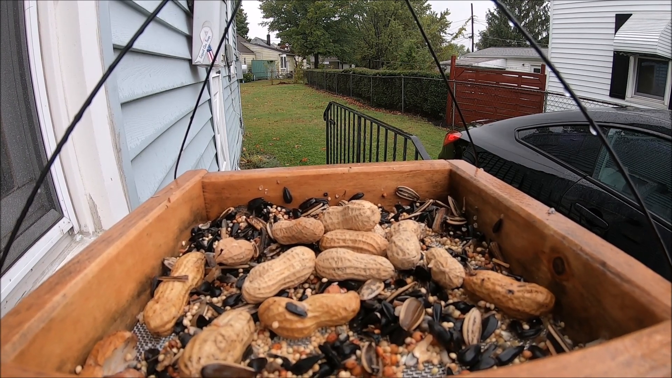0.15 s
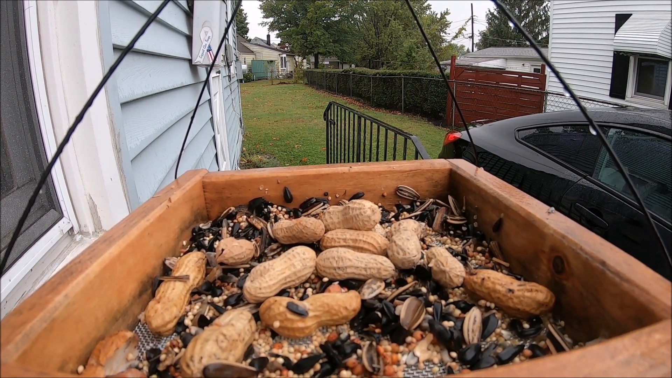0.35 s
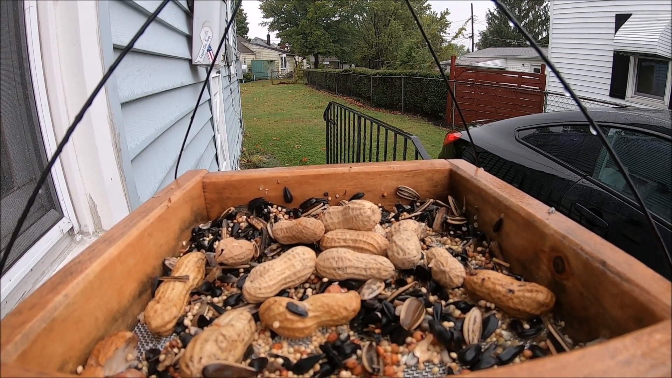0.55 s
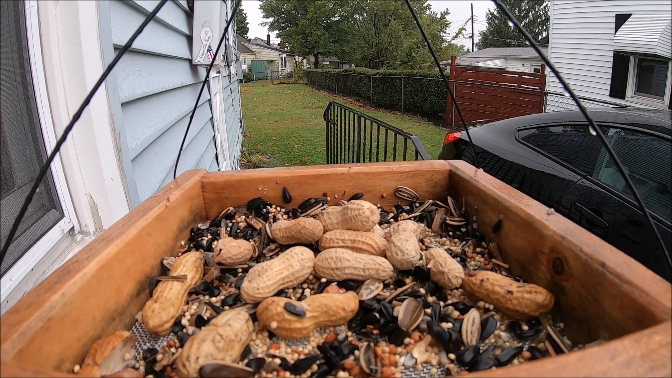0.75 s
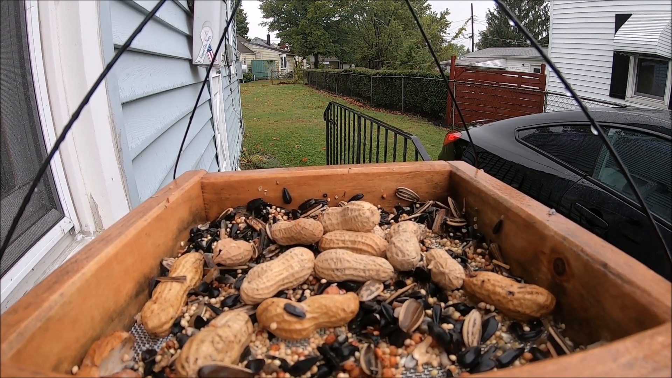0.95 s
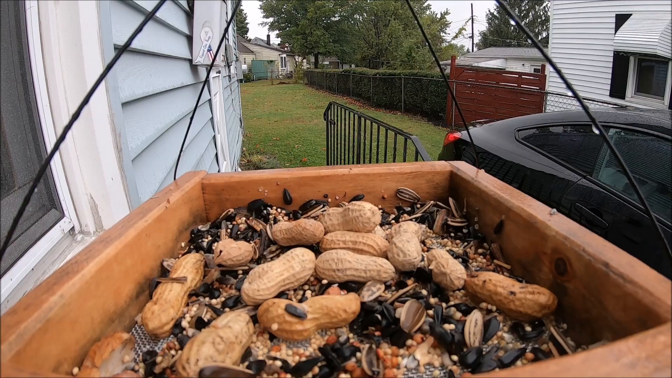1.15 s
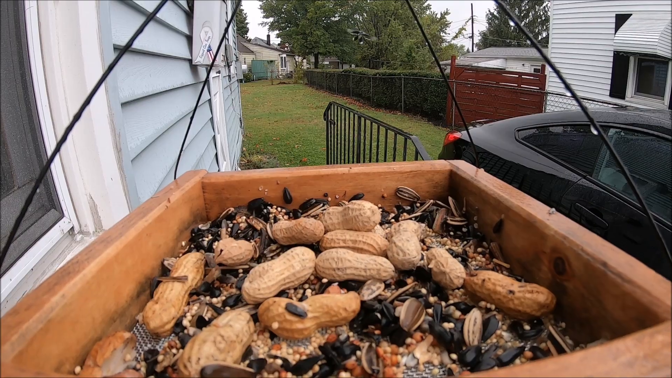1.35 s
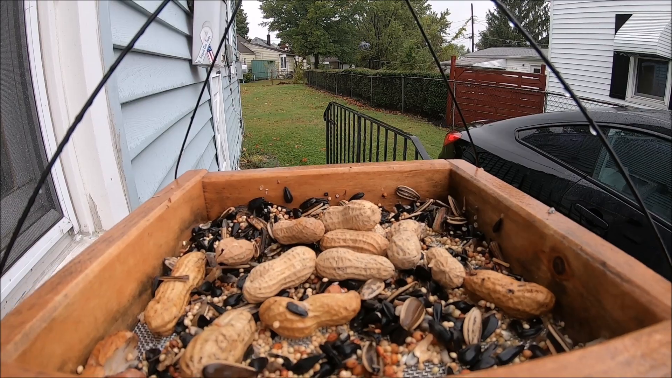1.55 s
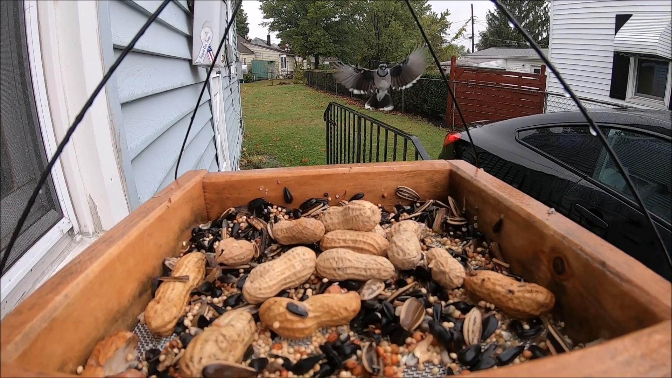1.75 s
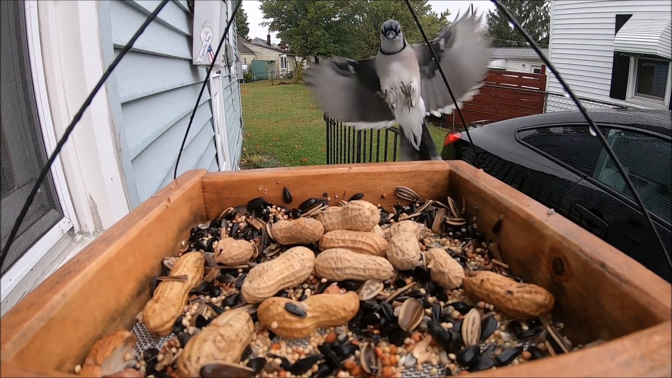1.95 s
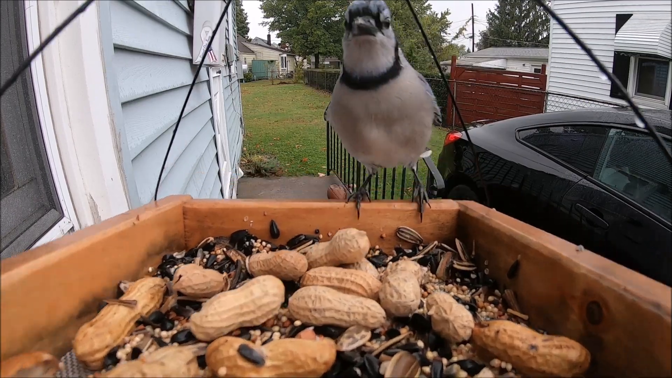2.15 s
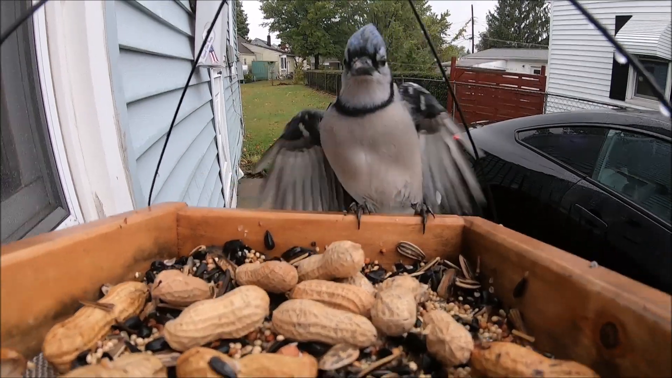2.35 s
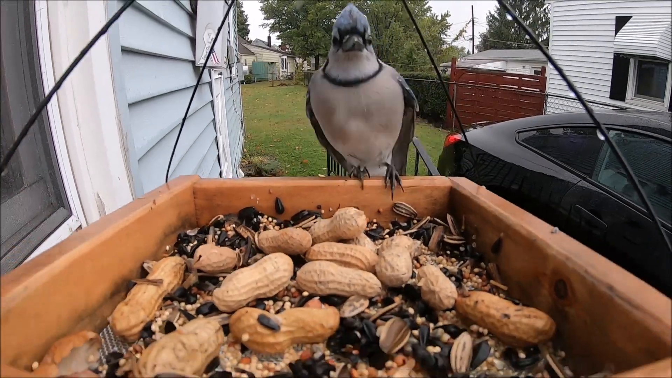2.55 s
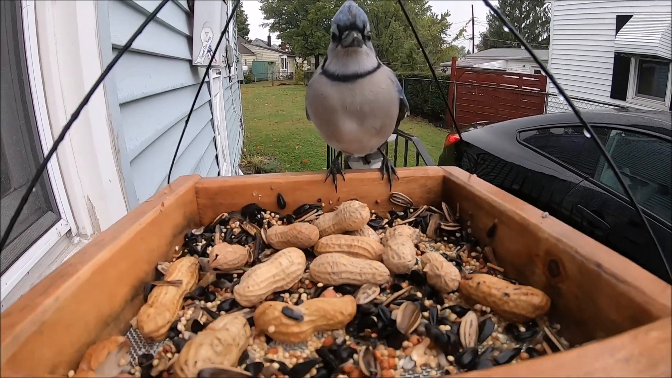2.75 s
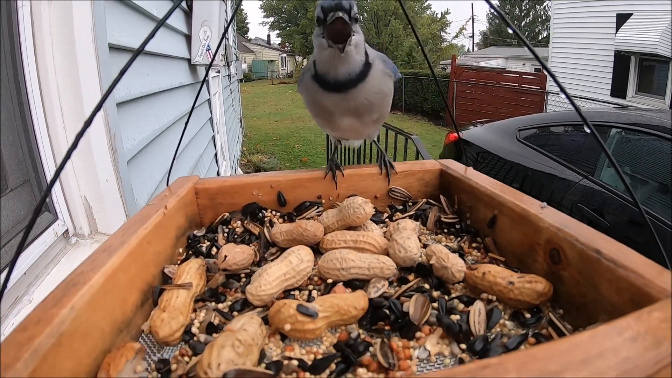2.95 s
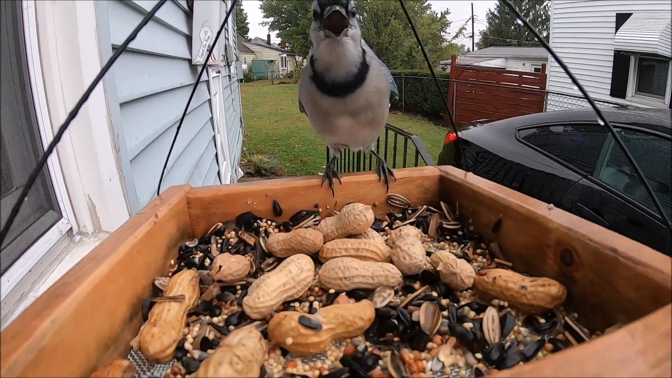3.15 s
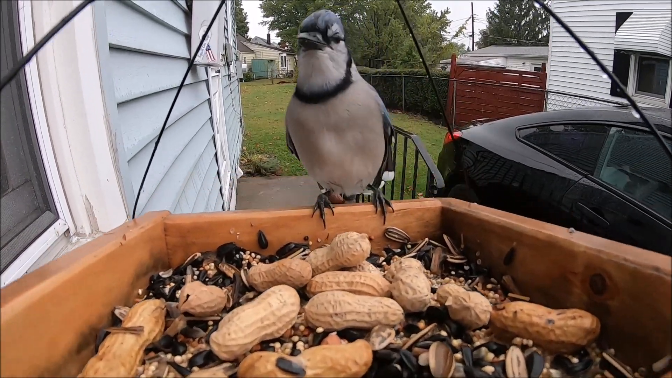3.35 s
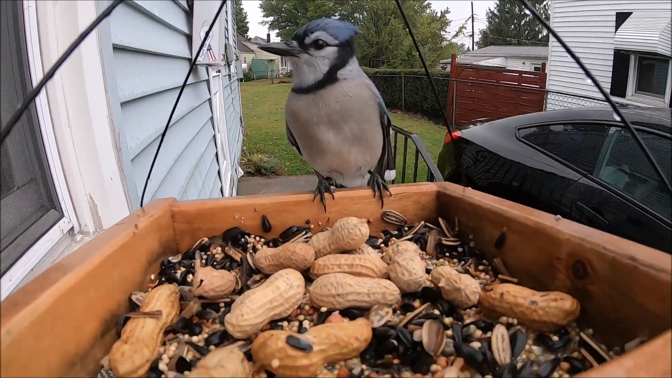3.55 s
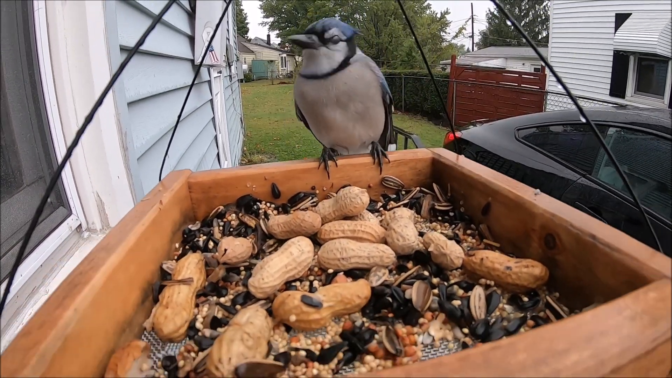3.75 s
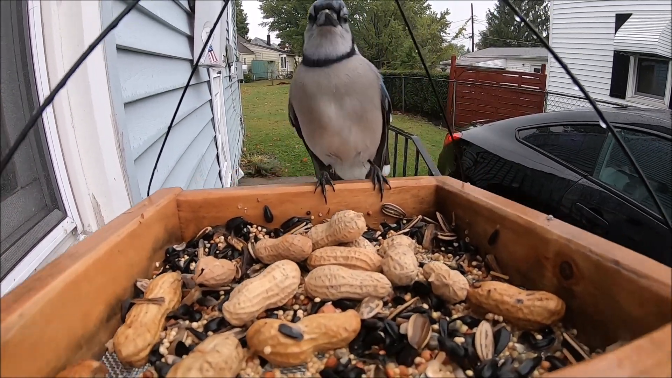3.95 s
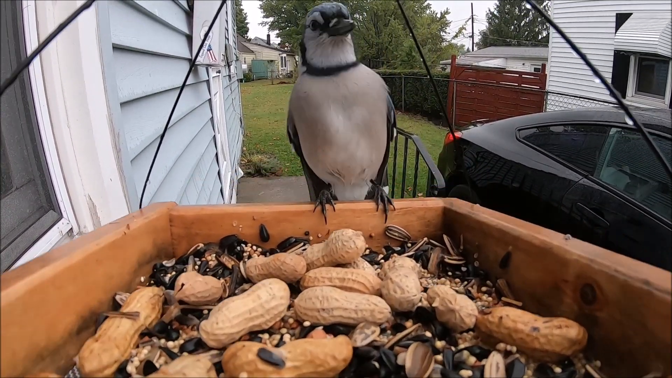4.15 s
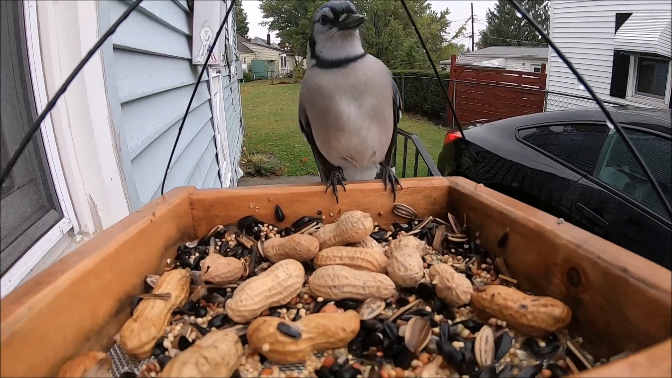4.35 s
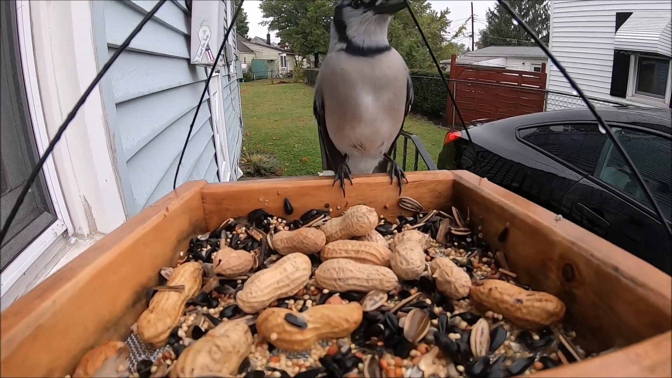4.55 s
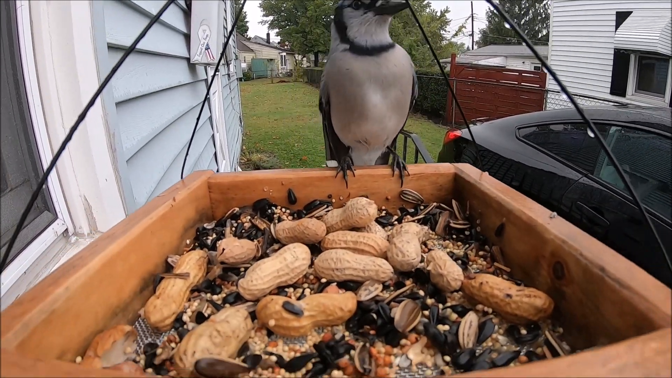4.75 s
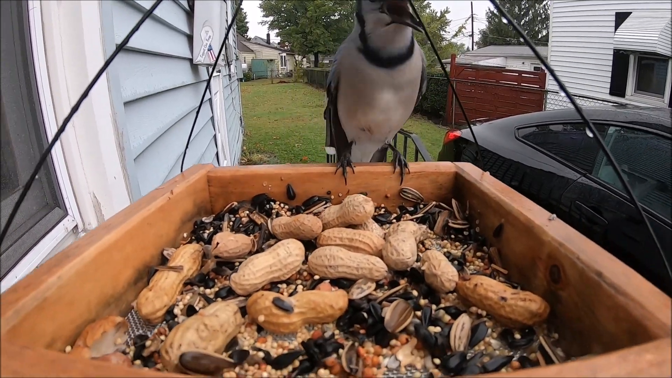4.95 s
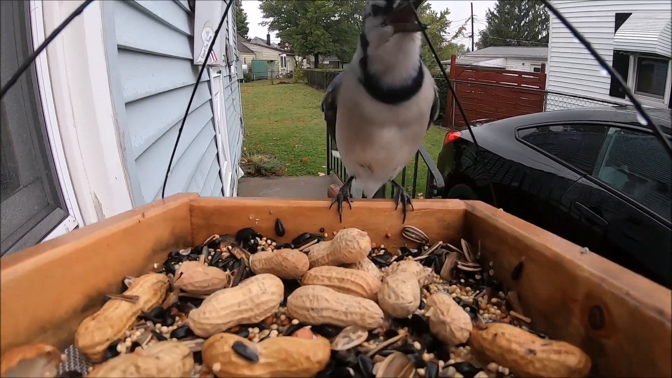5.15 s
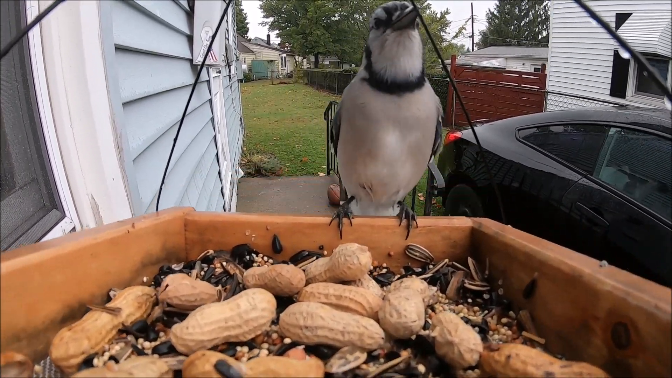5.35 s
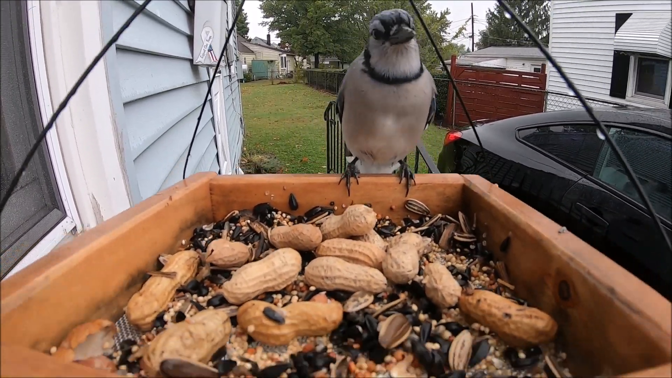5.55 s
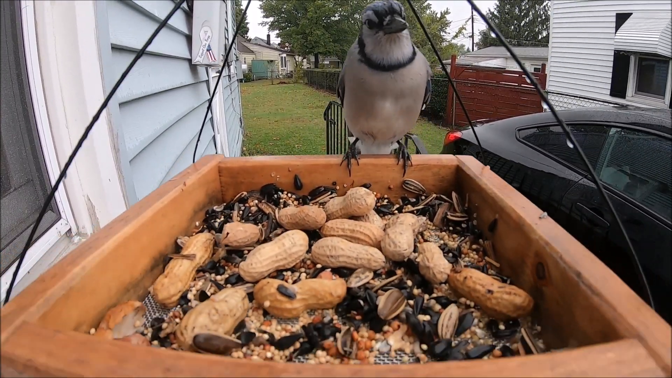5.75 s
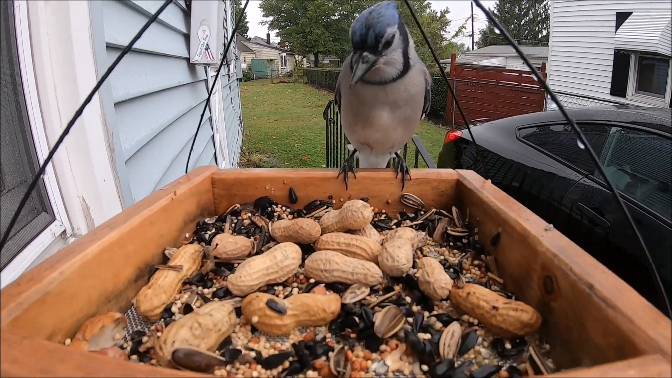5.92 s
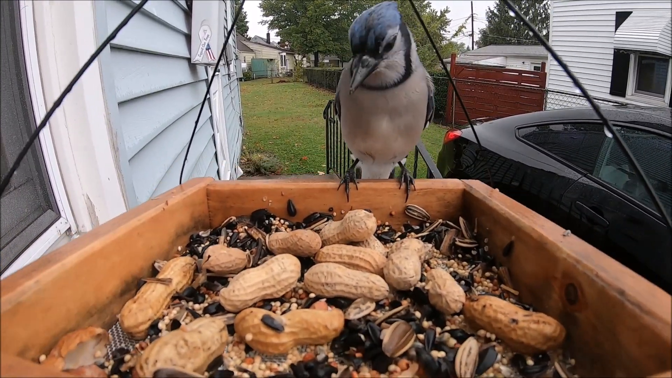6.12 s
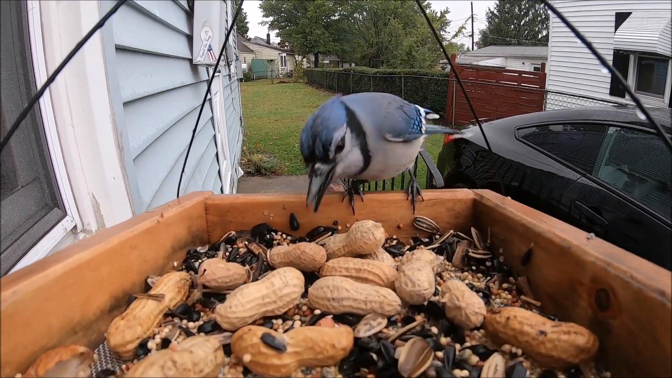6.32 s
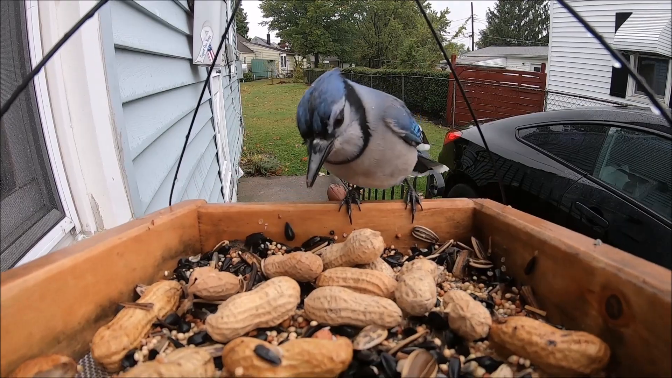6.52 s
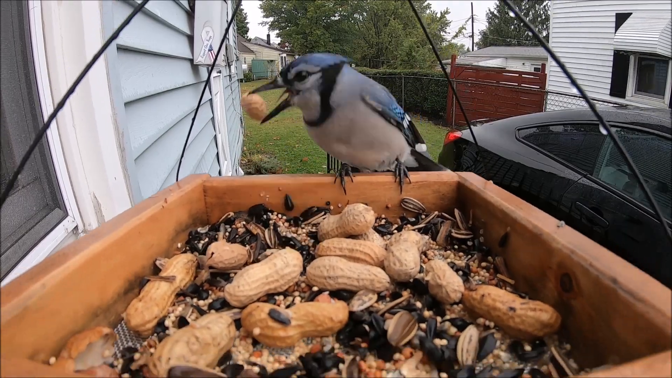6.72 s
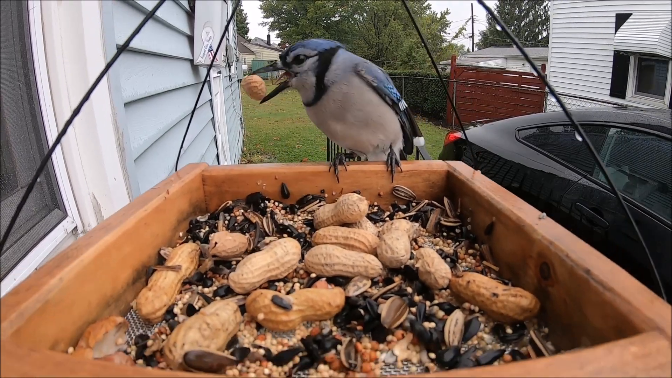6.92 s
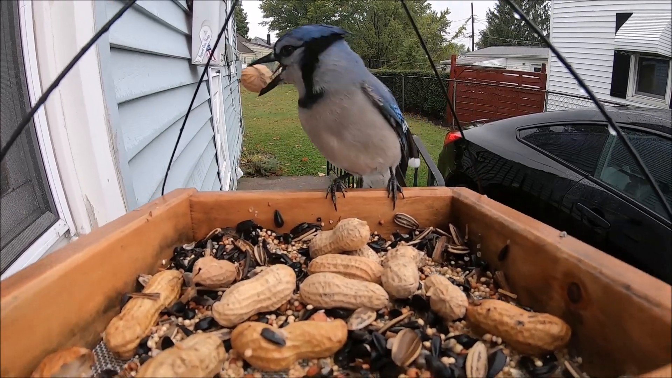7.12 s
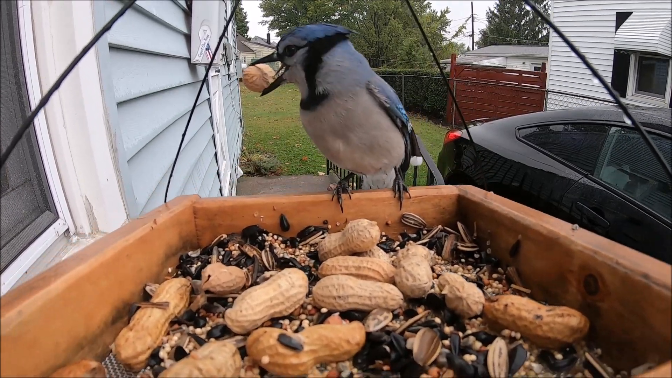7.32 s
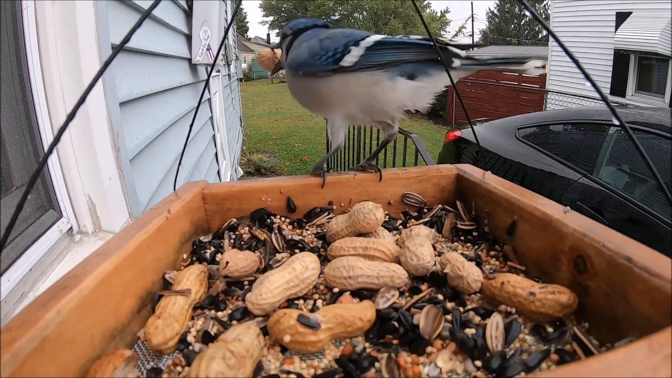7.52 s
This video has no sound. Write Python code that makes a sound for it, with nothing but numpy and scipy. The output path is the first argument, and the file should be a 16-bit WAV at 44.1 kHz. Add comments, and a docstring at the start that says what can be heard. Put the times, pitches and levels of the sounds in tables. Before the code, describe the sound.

Light rain patters over a low neighbourhood drone. Feathers rustle in, a bird lands with a dry woody knock and a scatter of clicks on the tray, and balances with a faint flutter. Two brief, piercing, descending, raspy jay calls follow about two seconds apart, with slight outdoor echoes. The rain ducks after each and creeps back. Faint pecking and closing ticks end it, in close stereo.

```python
"""A backyard in light rain, two microphones a hand's width from a hanging wooden feeder.
A blue jay flutters in, lands with a thump and screams twice: rough harmonic stacks ruled by the 4th harmonic.
Struck board modes rattle and a low shudder sways the tray; claws, seeds and drops tick as cracks with damped rings.
Behind lie the yard's echoes, filtered-noise rain and a low rumble.
The recorder's gain control ducks everything under each scream, then lets the background creep back."""
import sys
import numpy as np
from scipy import signal
from scipy.fft import rfft, irfft
from scipy.io import wavfile
from scipy.ndimage import uniform_filter1d, minimum_filter1d

SR = 44100
rng = np.random.default_rng(int(sys.argv[2]) if len(sys.argv) > 2 else 0)


def output_pcm(signal):
    """Save a mono or channel-first signal as 16-bit PCM at the path in sys.argv[1].

    Samples are clipped to [-1, 1] before scaling.
    """
    pcm = np.clip(np.atleast_2d(signal).T, -1, 1) * 32767
    wavfile.write(sys.argv[1], SR, np.round(pcm).astype(np.int16))


N = 338688
TIME = np.arange(N) / SR
FREQS = np.fft.rfftfreq(N, 1 / SR) + 1e-3  # kept above zero for the logarithm

# The two screams, before the boost for closeness: (time [s], length [s], settled pitch before the sag [Hz],
# level [dB], fade [dB/s], upper harmonics [dB relative], scoop [s], harshness at the end [0-1])
SCREAM_CALLS = [(3.0198, .307, 896, -10.7, 30, -11.5, .0065, .06),
                (4.9808, .328, 895, -10.2, 24, -10.5, .0085, .12)]
# Upper harmonics as they leave the beak: (frequency [Hz], level [dB relative])
THROAT_COLOUR = [(3900, -19.5), (4400, -24), (4750, -12), (5900, -6), (7400, -4), (8300, -18.5),
                 (9200, -15), (10200, -31.5), (11200, -37.5), (13000, -38), (15500, -48.5)]
# Harmonics 1 to 3 against the 4th: (level [dB])
LOW_HARMONIC_LEVELS = [-44.5, -24, -16]
# Rasp between the harmonics: (frequency [Hz], level [dB relative])
RASP_COLOUR = [(1000, -30), (2000, -22), (2500, -6), (3100, -6), (4100, 4), (4550, -15), (5700, 1),
               (6700, 3), (8200, -10), (9200, -9), (10800, -26), (13000, -28), (15500, -38)]
# How much louder the screams reach the left microphone: (frequency [Hz], difference [dB])
LEFT_BALANCE = [(800, 2), (1650, 1.5), (2500, 4.5), (3200, .5), (5000, .5), (8000, 2.5), (15000, 3)]
# How far the left microphone leads for the screams: (frequency [Hz], phase [rad])
LEFT_LEAD = [(800, -0.18), (3300, -.45), (5300, 0.64), (7100, 0.35), (8300, 1.2), (9300, 0.47),
             (10200, 1.5), (12800, 1.3), (15000, .4)]
# The jay's blows on the tray, before the treble roll-off:
# (time [s], thud level [dB], thud pitch [Hz], ring level [dB], rattle decay time [s])
TRAY_BLOWS = [(2.3363, -4, 140, -5, 0.0039), (2.348, -26, 71, -19, 0.0024), (2.381, -27, 109, -24, 0.019),
              (2.396, -25, 79, -19, 0.0029), (2.451, -22, 75, -26, .018), (2.476, -34, 90, -23, 0.0039),
              (2.545, -25.5, 90, -21, 0.01), (2.567, -18, 69, -28, 0.0052), (2.639, -34, 90, -35, .0096),
              (6.68, -38, 279, -46, .005)]
# What the tray's boards ring with: (frequency [Hz], level [dB relative], time to fall 60 dB [s])
TRAY_MODES = [(371, 3.5, 0.053), (1092, 5, 0.073), (1264, 20.5, 0.032), (1290, -10, 0.028),
              (1623, 8.5, 0.063), (3066, -35.5, .025), (3440, -1, 0.023)]
# The jay's weight sets the tray swinging on its cords, as it lands and as it bobs with each scream:
# (time [s], level [dB], time to the widest swing [s], left over right [ratio])
SWING_PUSHES = [(2.33, -28, 0.14, -0.092), (2.98, -35.5, .13, 0.81), (4.94, -37.5, .12, .9)]
# Shudder of the swinging tray: (frequency [Hz], level [dB relative])
SHUDDER_COLOUR = [(20, -11.5), (52, 7), (90, -4.5), (150, -11.5), (300, -37.5), (900, -91.5)]
# Ticks of drops, claws and shells, before the treble roll-off: (time [s], ring level [dB],
# pitch [Hz], crack against ring [dB], share that comes through the mount [dB])
TICK_CONTACTS = [(0.083, -44.5, 1260, 3, 7.5), (1.224, -34, 1700, -5, 2), (2.101, -22.5, 1740, -12.5, -8.5),
                 (2.1014, -20.5, 3380, -2.5, -12), (2.287, -40, 3240, -6, -17), (2.311, -48, 1281, 1, -7),
                 (2.3364, -21, 2800, 3.5, 3), (2.349, -28, 3430, -8.5, -0.5), (2.375, -26, 1759, -14, 1.5),
                 (2.476, -28, 1666, -9, -1), (2.544, -36, 3580, -8, -1), (2.605, -42, 7200, -3, 1),
                 (2.676, -29.5, 1790, -8.5, -5.5), (4.2112, -40.5, 1750, 1, 0.5),
                 (4.614, -42.5, 2570, -7.5, -2), (4.8702, -44, 2860, 0.5, -10),
                 (4.959, -46, 5240, 3.5, -2.5), (6.6813, -32, 1120, -4, -10),
                 (6.686, -35.5, 723, -10.5, -9), (6.694, -34, 2300, -5.5, -16),
                 (7.5193, -33, 1690, -2.5, -4.5), (7.566, -42, 3850, -10, -11),
                 (7.602, -44.5, 1510, -7, -5), (7.631, -26, 1800, -2, -5)]
# Colour of cracks and scrapes as heard through the microphones: (frequency [Hz], level [dB relative])
CRACK_TONE = [(500, -10.5), (1300, -2), (3400, -2.5), (4700, -12.5), (7000, -5.5), (8300, -13), (9500, -12),
              (11500, -31.5), (15500, -40)]
# Claws, beak and peanut scraping: (time [s], length [s], level before lift and colour [dB])
SCRAPE_RUNS = [(2.097, 0.016, -39), (2.13, 0.035, -53), (2.304, .015, -44), (2.378, 0.044, -55.5),
               (2.44, .037, -47.5), (2.537, 0.037, -52.5), (2.622, 0.044, -53.5), (2.679, 0.014, -50.5),
               (3.002, 0.026, -47.5), (4.188, .014, -51), (4.969, 0.035, -52), (6.682, 0.036, -53.5),
               (6.722, .031, -58), (7.503, 0.044, -55.5), (7.547, 0.023, -54)]
# Treble roll-off of the microphones on close contact sounds: (frequency [Hz], gain [dB])
CONTACT_TONE = [(4000, 3.5), (9800, -2), (12000, -5), (15500, -16)]
# Wingbeats, flying in and catching balance:
# (time of the strongest beat [s], half length [s], level before the beat and rustle [dB])
WING_FLURRIES = [(1.944, 0.21, -57), (2.512, 0.17, -61.5)]
# Colour of wing rustle as heard through the microphones: (frequency [Hz], level [dB relative])
RUSTLE_TONE = [(500, 0.5), (1300, 2), (3400, -1.5), (4700, -13.5), (7000, -3), (8300, -16), (9500, -15),
               (11500, -24), (15500, -32)]
# Echoes from tray, siding and house fronts: (nominal delay [s], level before the yard's colour [dB])
YARD_ECHOES = [(.0031, -29), (.0074, -28.5), (.026, -31), (.052, -27), (.088, -33.5), (.135, -38.5)]
# What the surroundings give back: (frequency [Hz], gain [dB])
YARD_TONE = [(1000, 0), (2400, 1), (3300, 4), (6000, -6), (10000, -2.5)]
# Rain hiss: (frequency [Hz], density [dB per Hz, relative])
RAIN_COLOUR = [(180, -34.5), (300, -9), (353, -6.5), (459, -4), (627, -3), (714, -3.5), (959, -3.5),
               (1730, -4.5), (2820, -8), (4690, -18.5), (7060, -16), (8320, -28), (9640, -26),
               (12100, -50.5), (15000, -54.5)]
# Likeness of left and right in the rain: (frequency [Hz], correlation [-1 to 1])
RAIN_WIDTH = [(300, -0.11), (640, 0.68), (1410, 0.058), (3100, -0.11), (6820, -0.42), (15000, -0.41)]
# Distant rumble: (frequency [Hz], density [dB per Hz, relative])
RUMBLE_COLOUR = [(12, -38), (20, -10), (43, -2.5), (86, 2), (167, -7.5), (317, -24), (351, -25.5),
                 (450, -29), (580, -58.5), (990, -120)]
# Slow swell of the rumble: (time [s], level [dB relative])
RUMBLE_SWELL = [(0, -1.5), (1.9, 2), (3.2, 0.5), (6.5, 0.5), (7.68, 0)]

# Each scream scoops up from this share below its pitch, and sags steadily
SCOOP_SHARE, SAG_HZ_PER_S = .21, 350
# The voice is rough (0-1) at its start, locks a moment later, and turns rough again as it closes
ONSET_ROUGHNESS, LOCK_S, ROUGH_S = .5, .008, .016
CLOSING_ROUGHNESS, RELEASE_S = 0.2, .012
# A narrow throat resonance that the 8th harmonic slides through
RESONANCE_HZ, RESONANCE_HALF_WIDTH_HZ, RESONANCE_DB = 6550, 120, 10.5
# A scream swells, holds and fades; its upper harmonics fade less
SWELL_DB, SWELL_S, HOLD_S, BRIGHTEN_DB_PER_S = 6.5, 0.054, 0.09, 7.5
# A crack has this decay time at the given level; it halves for every so many dB that the contact is harder
CRACK_S, CRACK_AT_DB, CRACK_HALVES_DB = .002, -25.5, 28
# Boost of the screams for closeness, and the level above which the recorder turns down
CLOSE_DB, CEILING_DB = 14, -13
# Average levels, and the recorder's upper limit
RAIN_DB, RUMBLE_DB, TOP_HZ = -56.5, -43.5, 15650


def undb(db):
    """Decibels to gain."""
    return 10 ** (np.asarray(db) / 20)


def unit(x):
    """Scale to rms 1."""
    return x / np.sqrt(np.mean(x ** 2) + 1e-20)


def at_hz(points, hz):
    """Read a spectrum on a log-frequency axis."""
    f, value = np.transpose(points)
    return np.interp(np.log(hz), np.log(f), value)


def colour(x, points):
    """Filter by a spectrum of (frequency [Hz], level [dB]) points."""
    return irfft(rfft(x) * undb(at_hz(points, FREQS)), N)


def walk(rate, size=N):
    """Smooth chance with spread 1 that changes about rate times a second."""
    f = np.fft.rfftfreq(size, 1 / SR)
    return unit(irfft(rfft(rng.standard_normal(size)) / (1 + (f / rate) ** 4), size))


def add(out, s, x):
    """Mix a sound in from time s."""
    i = int(s * SR)
    out[..., i:i + x.shape[-1]] += x[..., :N - i]


def pair(mid, side, likeness):
    """Two unrelated sounds as left and right with the given correlation."""
    m = rfft(mid) * np.sqrt((1 + likeness) / 2)
    s = rfft(side) * np.sqrt((1 - likeness) / 2)
    return irfft(np.array([m + s, m - s]), N)


def ring(t, hz, t60):
    """A struck mode: a sine that falls 60 dB in t60 seconds."""
    return np.sin(2 * np.pi * hz * t) * np.exp(-np.log(1000) * t / t60)


def scream(length, top_hz, level_db, fade_db_per_s, upper_db, scoop_s, harshness,
           weak_db=-9, burst_db=2, octave_burst_db=8, fifth_db=17, jitter=0.036, shimmer=0.85,
           rasp_hz=220, waver=0.003, rasp_db=-21, crack_db=-18):
    """The syrinx snaps on, low and rough, scoops up and locks, then sags and coarsens; its 4th harmonic rules."""
    t = np.arange(int(length * SR)) / SR
    unlocked = np.exp(-(t / LOCK_S) ** 3)
    swelling = np.maximum(1 - t / SWELL_S, 0)

    onset = ONSET_ROUGHNESS * np.exp(-(t / ROUGH_S) ** 4)
    rough = np.clip(onset + harshness * (t / length) ** 3, 0, 1)
    rough = rough + CLOSING_ROUGHNESS * np.exp((t - length) / RELEASE_S)
    main_db = level_db - SWELL_DB * swelling - fade_db_per_s * np.maximum(t - HOLD_S, 0)

    scoop = 1 - SCOOP_SHARE * np.exp(-np.maximum(t - LOCK_S / 2, 0) / scoop_s)
    pitch = (top_hz - SAG_HZ_PER_S * t) * scoop
    pitch = pitch * (1 + jitter * rough * walk(rasp_hz, len(t))
                     + 0.0019 * walk(80, len(t)) + waver * walk(16, len(t)))
    phase = 2 * np.pi * np.cumsum(pitch) / SR

    voice = 0
    for k in range(1, 20):
        if k < 4:
            db = LOW_HARMONIC_LEVELS[k - 1] + walk(12, len(t))
        elif k == 4:
            db = weak_db * unlocked
        else:
            detune = (k * pitch - RESONANCE_HZ) / RESONANCE_HALF_WIDTH_HZ
            resonance = RESONANCE_DB / (1 + detune ** 2)
            db = upper_db + BRIGHTEN_DB_PER_S * (t - length / 2) + at_hz(THROAT_COLOUR, k * pitch)
            db = db + resonance * (1 - unlocked) + 1.8 * walk(13, len(t))
            db = db + unlocked * (octave_burst_db + burst_db * (2 - k / 5))
            db = db + (k == 5) * fifth_db * np.sqrt(swelling)
        # the odd harmonics only come in as the voice locks
        size = undb(db) * (1 - k % 2 * unlocked)
        # the faint 5th and the highest harmonics break up most
        flutter = shimmer * rough + (.1 + .6 * t / length) * (k == 5) + 1.2 * (k / 19) ** 4
        broken = size * (1 + flutter * walk(rasp_hz, len(t)))
        voice = voice + broken * np.sin(k * phase + rng.uniform(0, 2 * np.pi))

    # air rushes through once a cycle, most of it as the voice cracks on or turns harsh
    air = unit(colour(rng.standard_normal(N), RASP_COLOUR)[:len(t)])
    air_level = undb(rasp_db) * rough + undb(crack_db) * unlocked
    voice = voice + air_level * air * (1 + np.cos(phase))
    closing = np.sin(np.pi / 2 * np.clip((length - t) / RELEASE_S, 0, 1)) ** 2
    gate = np.clip(t / 0.0022, 0, 1) * closing
    return voice * gate * undb(main_db)


def jay():
    """Both screams, very loud at this distance, reaching the two microphones slightly out of step."""
    out = np.zeros(N)
    for start, *call in SCREAM_CALLS:
        add(out, start, scream(*call))
    # half the difference goes to each side
    left = undb(at_hz(LEFT_BALANCE, FREQS) / 2) * np.exp(.5j * at_hz(LEFT_LEAD, FREQS))
    return irfft(rfft(out) * np.array([left, 1 / left]), N) * undb(CLOSE_DB)


def tray(thud_cycles=2.0, thud_lag_s=0.0017, thud_left=-0.15, ring_left=-0.64):
    """Blows flex the tray and ring its boards; through the mount they reach left and right opposed."""
    out, t = np.zeros((2, N)), np.arange(SR // 8) / SR
    boards = sum(undb(db) * ring(t, hz, t60) for hz, db, t60 in TRAY_MODES)
    for s, thud_db, thud_hz, ring_db, length in TRAY_BLOWS:
        thud = ring(t, thud_hz, thud_cycles / thud_hz) * t  # soft feet: the push builds up
        # one sharp hit, then a rattle of chance contacts
        contact = 0.095 * rng.standard_normal(len(t)) * np.exp(-t / length) * length / 0.01
        contact[0] += 1
        wood = signal.fftconvolve(contact, boards)[:len(t)]
        wood = wood / np.abs(wood).max() * undb(ring_db)
        thud = thud / thud.max() * undb(thud_db)
        add(out, s, np.outer([ring_left, 1], wood))
        add(out, s + thud_lag_s, np.outer([thud_left, 1], thud))
    return out + swing()


def swing(loose=0.38):
    """After each push a low shudder builds up and dies away; a twist sets the two microphones apart."""
    shake, twist = unit(colour(rng.standard_normal((2, N)), SHUDDER_COLOUR))
    out = np.zeros((2, N))
    for s, db, rise_s, left in SWING_PUSHES:
        age = np.maximum(TIME - s, 0) / rise_s
        level = undb(db) * (age * np.exp(1 - age)) ** 2
        out += level * np.array([left * shake + loose * (1 - left) * twist, shake])
    return out


def ticks(ring_t60=0.0062, ring_rise_s=.0002, spread=0.25):
    """A short crack and the damped ring of the touched shell or board; the mount adds an opposed share."""
    cracks, rings, t = np.zeros((2, N)), np.zeros((2, N)), np.arange(SR // 20) / SR
    for s, db, hz, crack_db, mount_db in TICK_CONTACTS:
        noise = rng.standard_normal((3, len(t)))
        length = CRACK_S * 2 ** ((CRACK_AT_DB - db) / CRACK_HALVES_DB)
        sides = 1 + undb(mount_db) * np.array([[1], [-1]])
        crack = (noise[0] + spread * noise[1:]) * np.exp(-t / length)
        tone = ring(t, hz, ring_t60) * (1 - np.exp(-t / ring_rise_s))
        add(cracks, s, sides * crack * undb(db + crack_db))
        add(rings, s, sides * tone * undb(db))
    return colour(cracks, CRACK_TONE) + rings


def scrapes(slips_per_s=900, spread=0.98, lift_db=3.5):
    """A scrape is a short run of tiny uneven slips over steady friction noise."""
    out = np.zeros((2, N))
    for s, length, db in SCRAPE_RUNS:
        size = int(length * SR)
        noise = rng.standard_normal((3, size))
        slips = (rng.random(size) < slips_per_s / SR) + 0.45
        run = (noise[0] + spread * noise[1:]) * slips * np.hanning(size) ** .5
        add(out, s, unit(run) * undb(db + lift_db))
    # the second filter tilts the crack tone: (frequency [Hz], gain [dB])
    return colour(colour(out, CRACK_TONE), [(500, -2.5), (1500, 0.5), (3500, 0.5), (7000, -2)])


def wings(beat_hz=10.7, depth_db=2.0, uneven_db=1.9, crisp_db=2):
    """Feathers swish and rustle with every wingbeat; each flurry swells and fades."""
    level = np.zeros(N)
    for s, half_length, db in WING_FLURRIES:
        flurry = np.exp(-((TIME - s) / half_length) ** 4)
        beat_db = depth_db * np.cos(2 * np.pi * beat_hz * (TIME - s))
        level += flurry * undb(db + beat_db)
    rustle = undb(uneven_db * walk(30) + crisp_db * walk(440))
    return unit(colour(rng.standard_normal((2, N)), RUSTLE_TONE)) * level * rustle


def yard(x, t60=.82, wet_db=-34.0):
    """A few distinct echoes and a thin diffuse tail, different at each microphone."""
    t = np.arange(SR) / SR
    tail = unit(rng.standard_normal((2, SR)) * undb(-60 * t / t60))
    response = tail * undb(wet_db) / np.sqrt(SR)
    for delay, db in YARD_ECHOES:
        for side in response:
            side[int(delay * rng.uniform(.9, 1.1) * SR)] += undb(db)
    return colour(signal.fftconvolve(x, response, axes=1)[:, :N], YARD_TONE)


def rain(drops_per_s=70, drop_db=-45, size_db=3.5):
    """Countless far drops merge into a hiss; a few nearer ones patter out of it."""
    likeness = np.clip(at_hz(RAIN_WIDTH, FREQS), -1, 1)
    hiss = pair(*rng.standard_normal((2, N)), likeness)
    hiss = unit(colour(hiss, RAIN_COLOUR)) * undb(RAIN_DB + 0.62 * walk(4.1))
    sizes = undb(size_db * np.minimum(rng.exponential(size=N), 4))
    drops = (rng.random(N) < drops_per_s / SR) * sizes
    patter = colour(drops * rng.uniform(.4, 1, (2, N)), CRACK_TONE)
    return hiss + patter * undb(drop_db)


def rumble(likeness=0.98, waver_db=0.24):
    """The low, gently wavering drone of the neighbourhood, nearly alike at both microphones."""
    air = pair(*rng.standard_normal((2, N)), np.clip(likeness, 0, 1))
    swell_db = np.interp(TIME, *np.transpose(RUMBLE_SWELL))
    return unit(colour(air, RUMBLE_COLOUR)) * undb(RUMBLE_DB + swell_db + waver_db * walk(5.3))


def scene():
    """The feeder close by, the yard around it."""
    near = jay() + colour(ticks() + scrapes(), CONTACT_TONE) + wings()
    return near + yard(near) + colour(tray(), CONTACT_TONE) + rain() + rumble()


def gain_control(x, release_db_per_s=9.0, deaf_below_hz=200):
    """The gain drops at once under a loud sound, holds, then climbs back steadily; it barely heeds the bass."""
    window_s, hold_s = .006, .24
    bass_cut = signal.butter(1, deaf_below_hz, "high", fs=SR, output="sos")
    heard = signal.sosfilt(bass_cut, x)
    power = uniform_filter1d(np.mean(heard ** 2, axis=0), int(window_s * SR))
    over = np.maximum(10 * np.log10(np.abs(power) + 1e-12) - CEILING_DB, 0)
    # hold the largest overshoot of the last moments
    hold = 2 * int(hold_s * SR / 2) + 1
    held = -minimum_filter1d(-over, hold, origin=hold // 2)
    # a running maximum on a rising ramp lets the cut shrink no faster than the release
    ramp = release_db_per_s * TIME
    cut_db = np.maximum.accumulate(held + ramp) - ramp
    return x * undb(-uniform_filter1d(cut_db, size=128))


def record(dry):
    """The recorder rides its gain and cuts the top."""
    top_cut = signal.ellip(10, .1, 80, TOP_HZ, fs=SR, output="sos")
    return signal.sosfilt(top_cut, gain_control(dry))


dry = scene()
out = record(dry)
output_pcm(out)
```